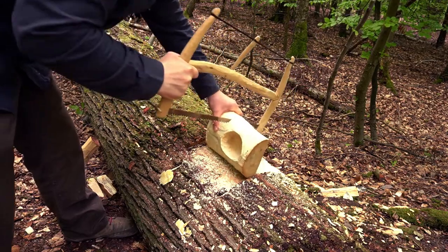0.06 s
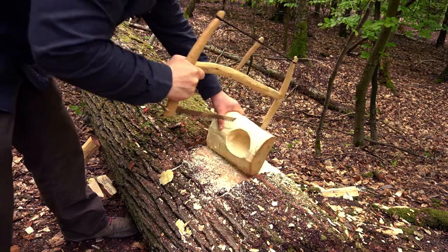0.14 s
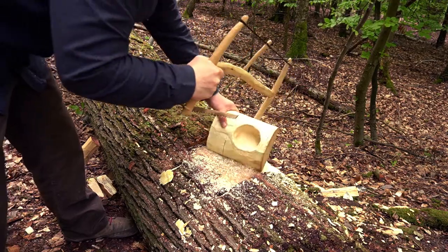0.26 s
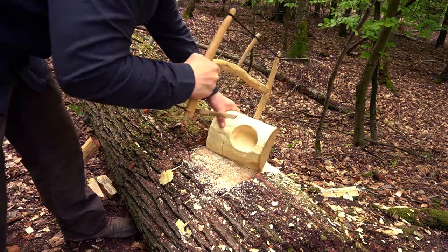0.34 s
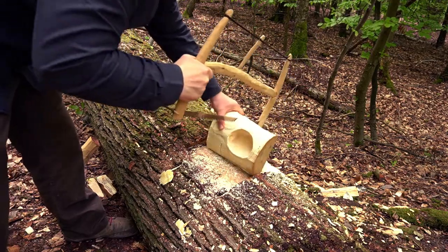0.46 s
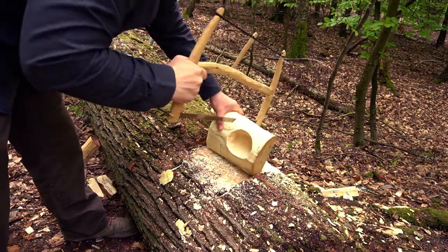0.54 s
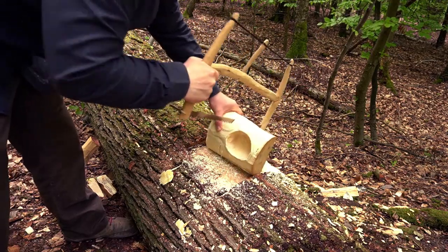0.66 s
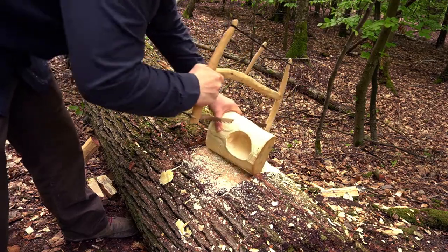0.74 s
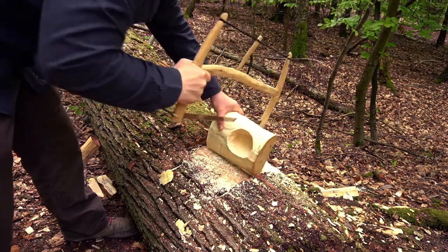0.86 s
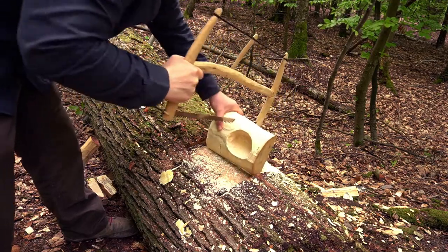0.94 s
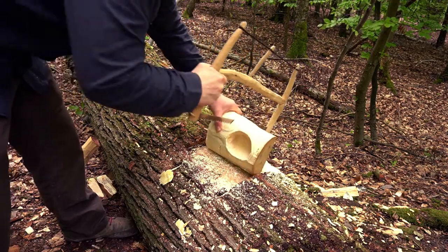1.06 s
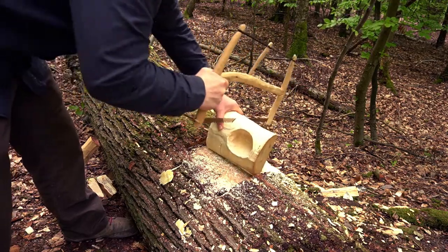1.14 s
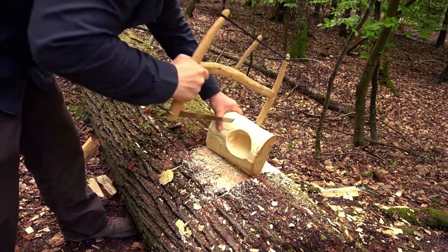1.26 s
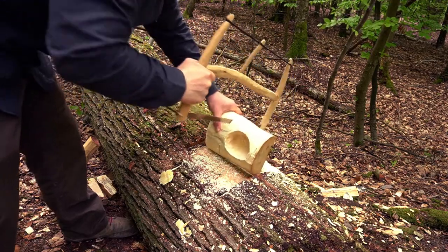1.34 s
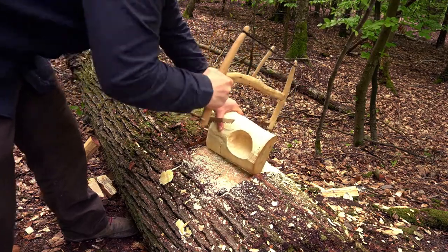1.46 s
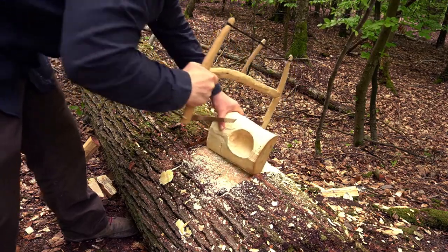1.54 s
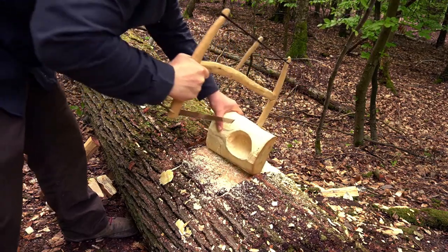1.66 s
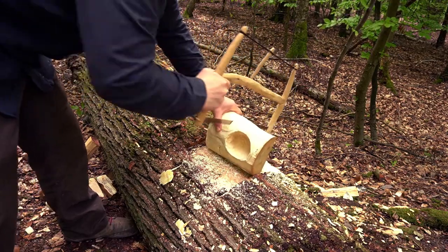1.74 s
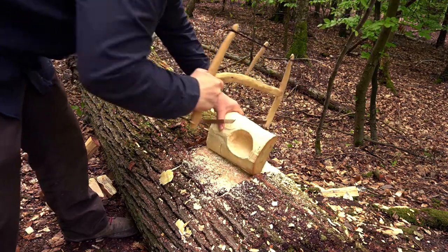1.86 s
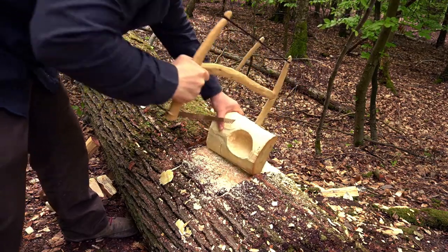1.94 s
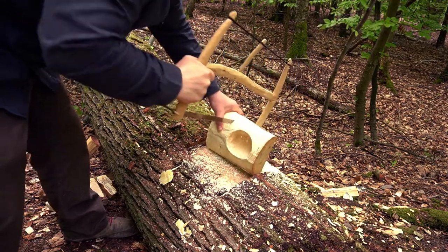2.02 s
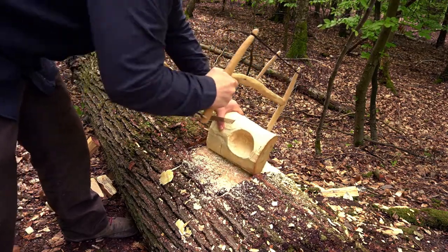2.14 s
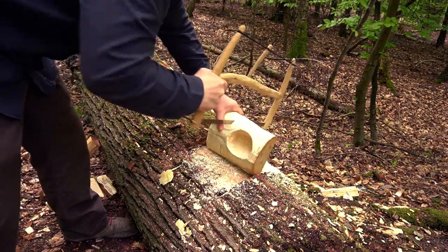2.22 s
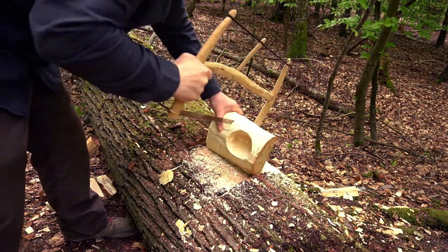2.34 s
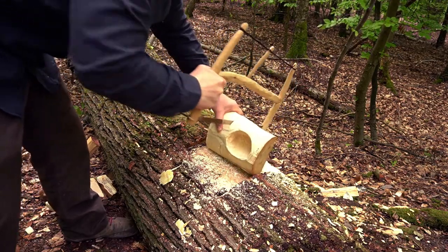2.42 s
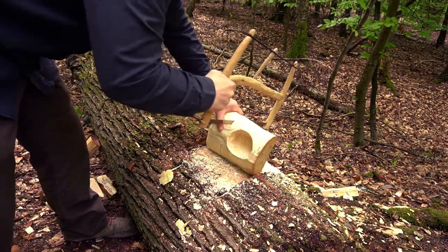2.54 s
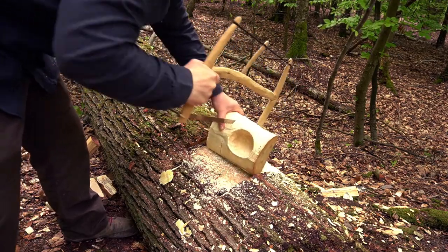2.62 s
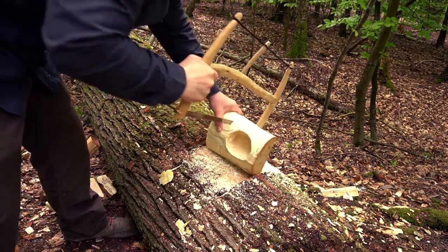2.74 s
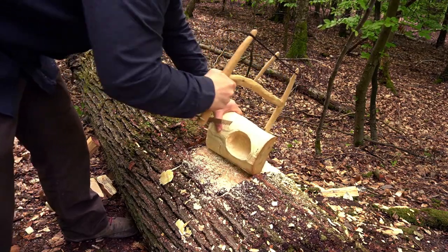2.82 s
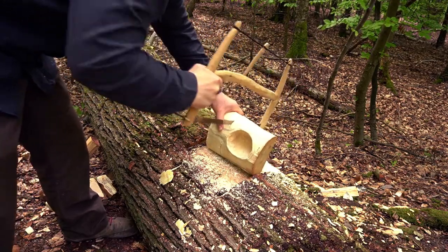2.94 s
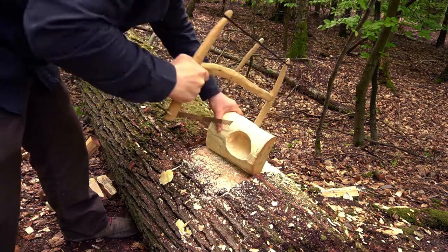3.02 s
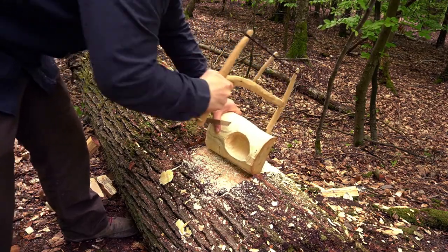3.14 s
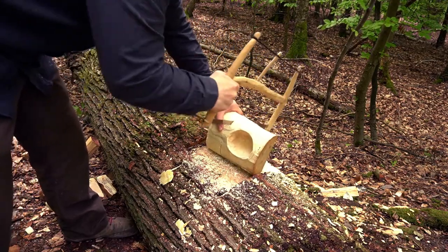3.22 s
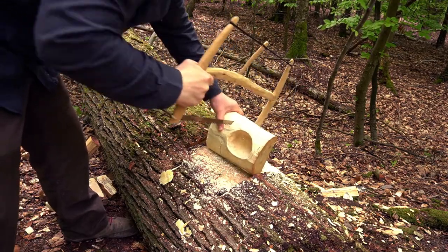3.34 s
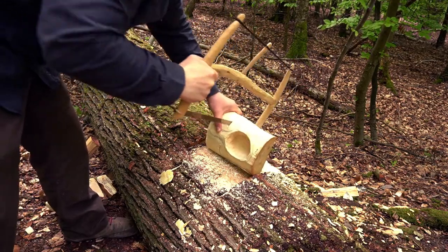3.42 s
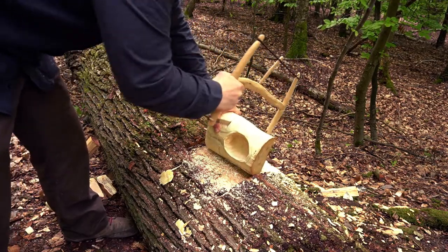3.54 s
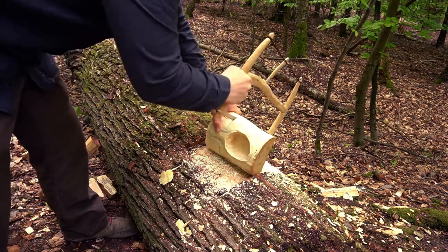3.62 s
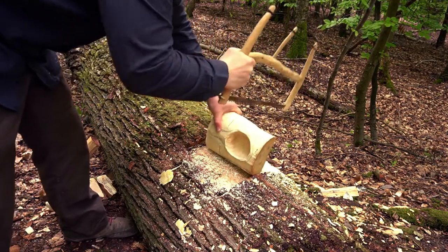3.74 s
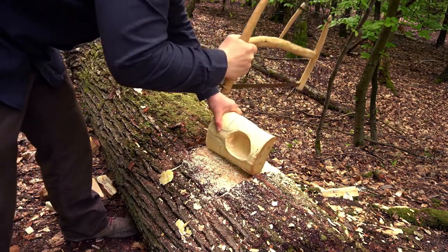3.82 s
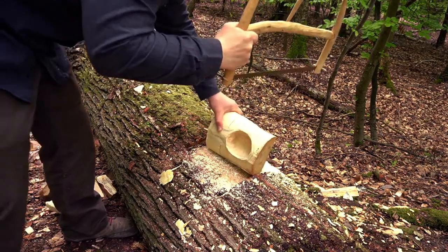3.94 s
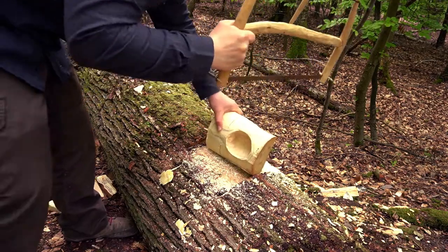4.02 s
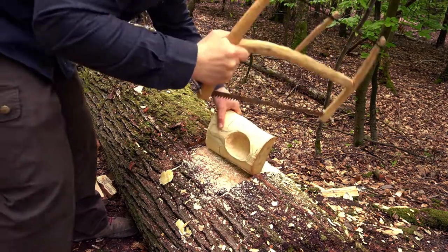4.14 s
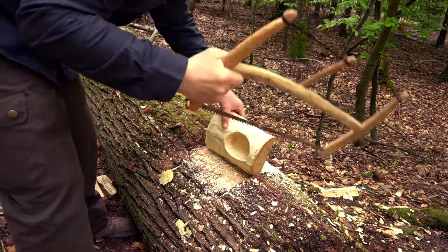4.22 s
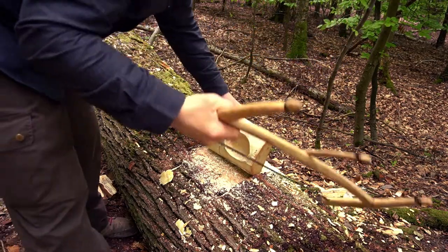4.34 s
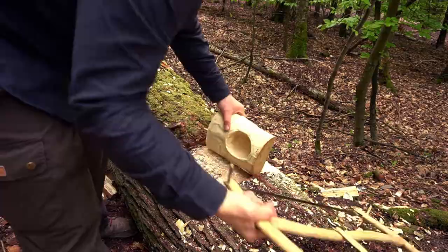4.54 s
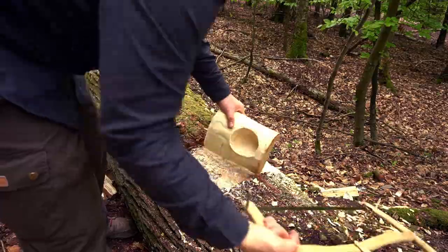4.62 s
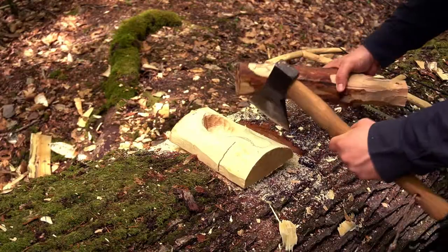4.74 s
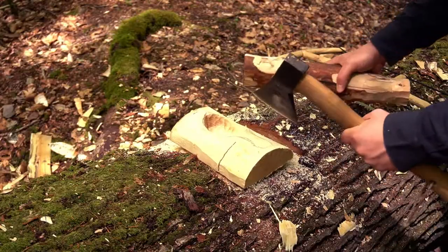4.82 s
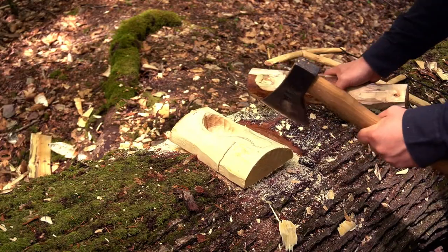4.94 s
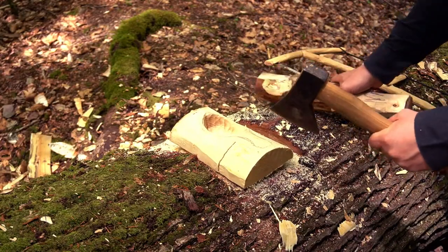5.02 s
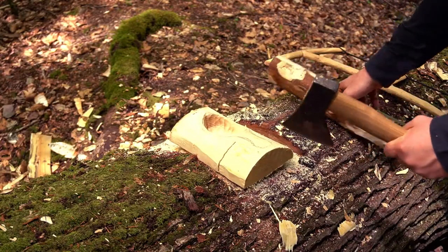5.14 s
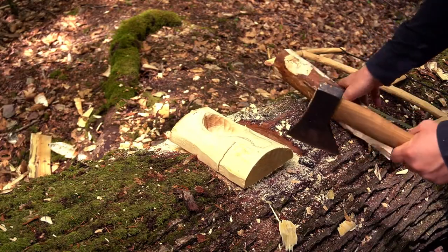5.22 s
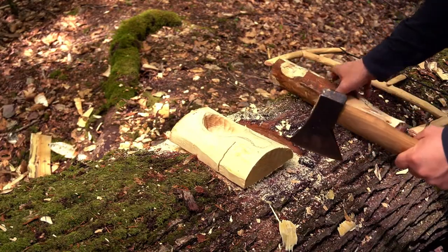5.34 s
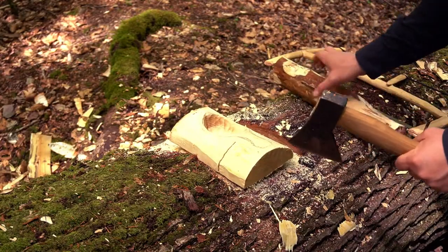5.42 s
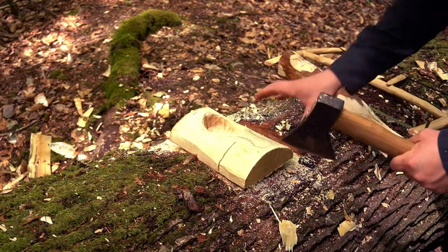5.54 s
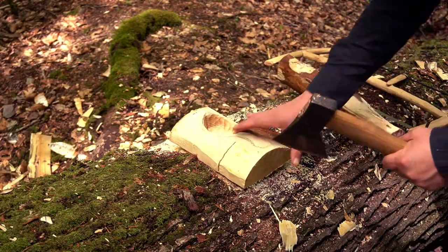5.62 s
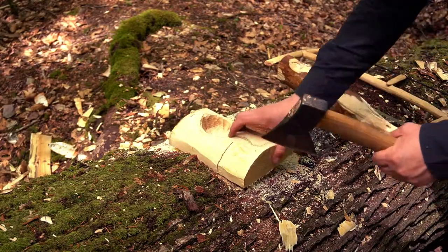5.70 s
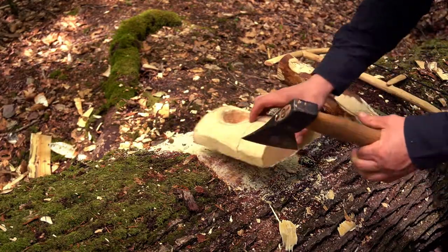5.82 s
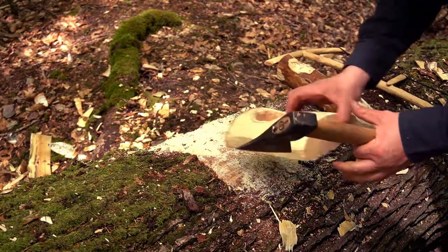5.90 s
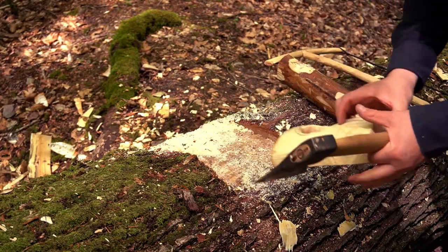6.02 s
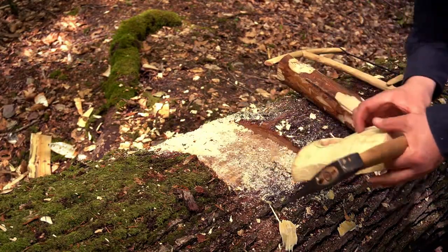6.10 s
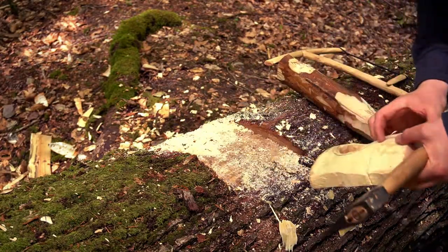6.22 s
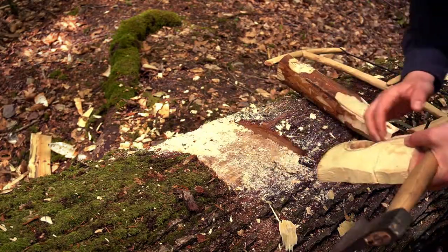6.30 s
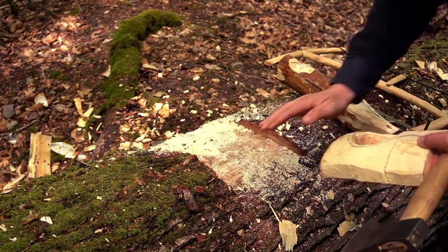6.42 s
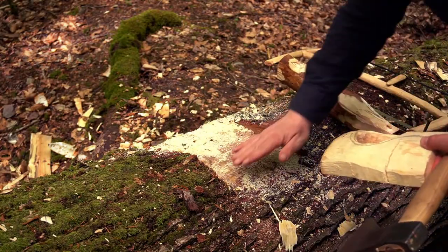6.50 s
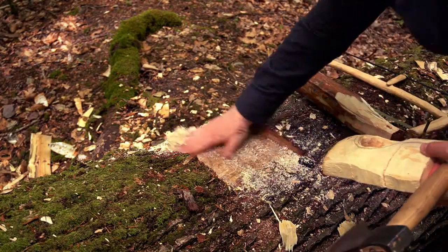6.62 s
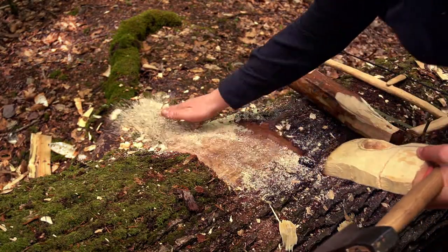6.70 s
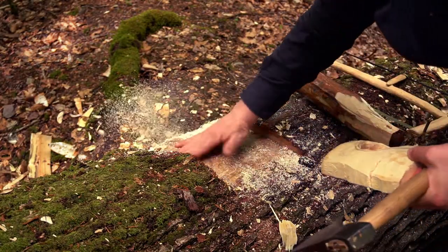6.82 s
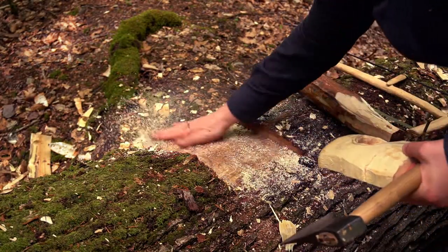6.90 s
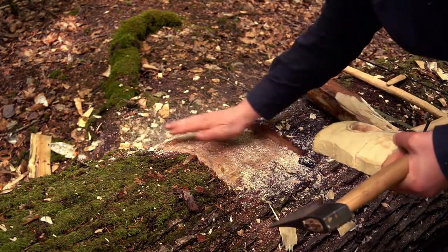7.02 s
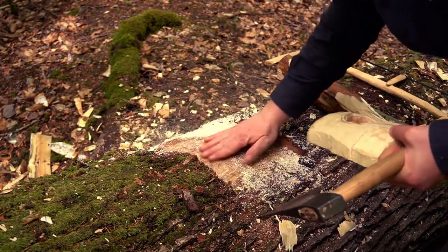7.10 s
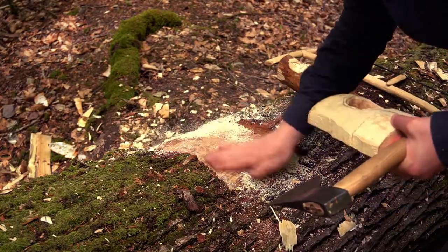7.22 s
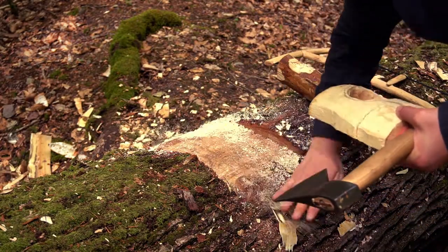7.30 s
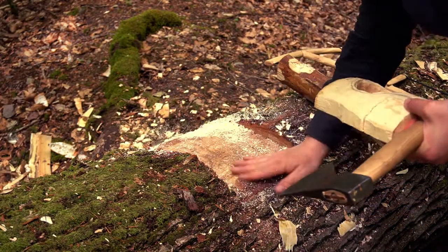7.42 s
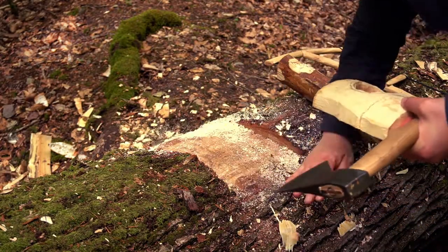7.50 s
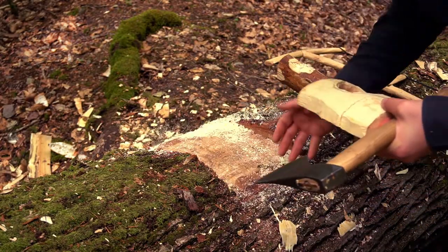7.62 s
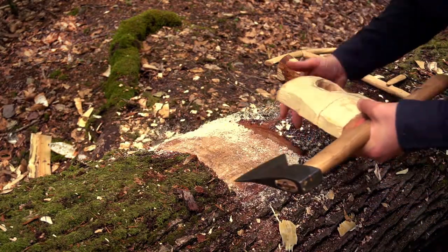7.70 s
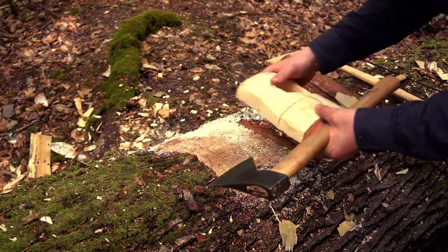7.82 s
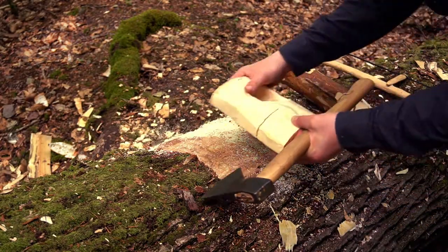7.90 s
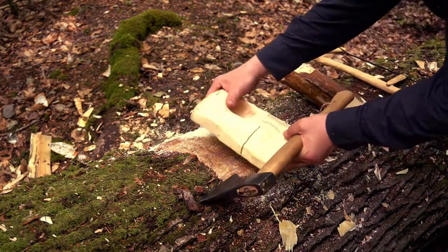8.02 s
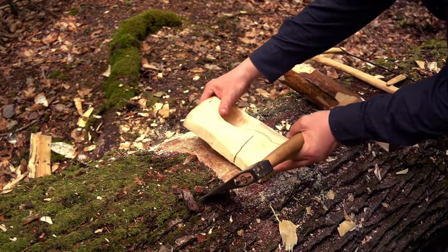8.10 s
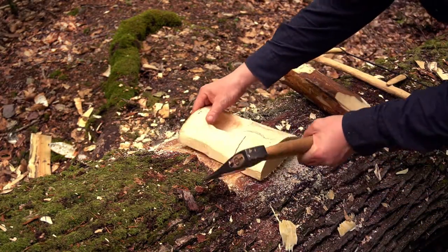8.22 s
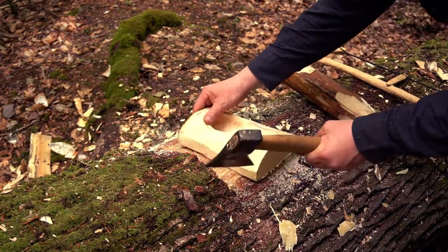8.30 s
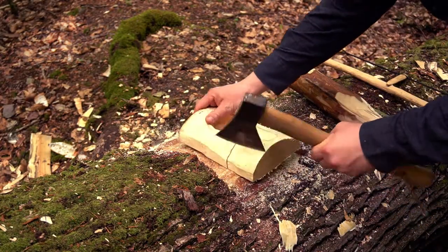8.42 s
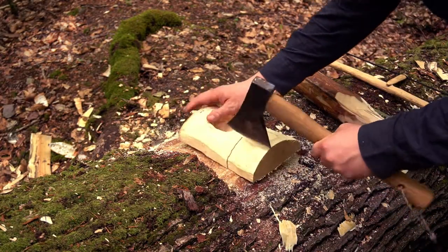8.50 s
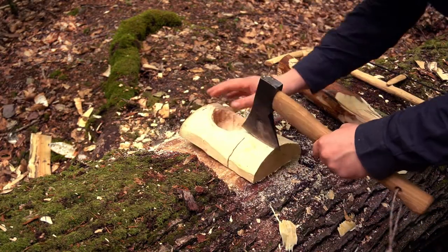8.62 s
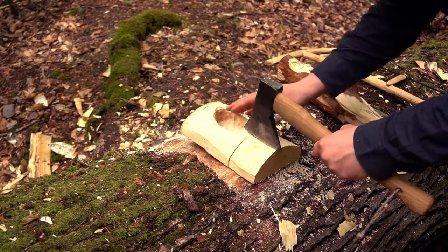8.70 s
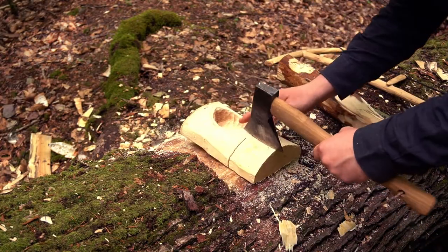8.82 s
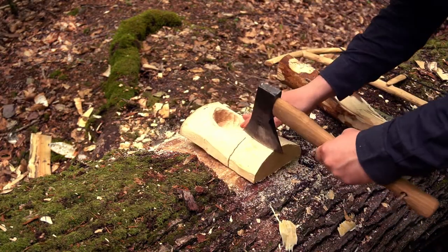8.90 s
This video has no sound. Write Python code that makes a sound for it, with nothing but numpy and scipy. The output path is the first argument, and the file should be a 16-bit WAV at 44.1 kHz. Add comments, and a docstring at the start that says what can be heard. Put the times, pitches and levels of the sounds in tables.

```python
"""A frame saw rasps to and fro through a hollowed block of green wood that knocks on a fallen trunk.
Its teeth tear fibres in dense clicks that drive the resonances of block and blade, until the blade is
lifted out with a clink. Then, closer to the trunk, chips tick, a bird sings far off, a hand sweeps
sawdust from the bark with a hiss of friction, and a touched hatchet head rings in its steel modes.
Trees echo the saw and the bird, and under everything lies the hush of the forest."""
import sys
import numpy as np
from scipy import signal
from scipy.fft import rfft, irfft, next_fast_len
from scipy.io import wavfile
from scipy.ndimage import uniform_filter1d

SR = 44100
rng = np.random.default_rng(int(sys.argv[2]) if len(sys.argv) > 2 else 0)


def write(x):
    x = np.atleast_2d(x).T
    wavfile.write(sys.argv[1], SR, np.round(np.clip(x, -1, 1) * 32767).astype(np.int16))


N = 394694
TIME = np.arange(N) / SR

# saw strokes: (start [s], attack [s], hold [s], level [dB], change over the hold [dB], brightness [dB])
SAW_STROKES = [(-.02, .02, 0.076, -32.5, -7, 0), (.12, 0.037, 0.081, -35, -7.5, -3.5),
               (.468, 0.024, 0.063, -44.5, -2, -3), (.64, 0.051, .058, -25, -3, -0.5),
               (.81, 0.03, 0.084, -31.5, -2, 1.5), (.985, 0.039, .075, -26.5, -1.5, 1),
               (1.175, 0.032, 0.073, -31, -8.5, 4.5), (1.31, 0.057, 0.061, -23.5, 1, 1.5),
               (1.51, 0.032, 0.08, -27, -8.5, 1.5), (1.655, 0.028, 0.092, -31, 7.5, 1.5),
               (1.86, 0.029, 0.093, -31.5, -6.5, 3), (2.01, 0.051, 0.075, -22.5, -1, -0.5),
               (2.215, 0.033, 0.084, -30.5, -2.5, 1.5), (2.38, 0.041, 0.07, -24.5, -0.5, 1.5),
               (2.565, 0.035, 0.085, -31, -3, 2.5), (2.725, 0.051, 0.068, -22, -2, -1),
               (2.905, 0.039, .085, -32, -3.5, 3), (3.06, 0.053, 0.056, -25, 5, 2),
               (3.26, .04, 0.079, -32.5, -4, 3), (3.41, 0.069, 0.078, -22.5, -5, -1.5),
               (3.64, 0.02, .05, -45, 2, 0.5)]
# the blade binds and jerks on through, mostly on the pull: (time [s], level [dB])
BLADE_JERKS = [(.165, -31), (.184, -29.5), (0.212, -32), (.236, -41), (.52, -40), (.546, -43), (.66, -31),
               (.848, -41), (.879, -30), (1.22, -25), (1.252, -29), (1.278, -35), (1.548, -24.5),
               (1.577, -27), (1.602, -29.5), (1.822, -37), (1.897, -20.5), (1.933, -23.5), (1.96, -32.5),
               (2.256, -35), (2.289, -27), (2.609, -30), (2.955, -29), (3.312, -24.5), (3.349, -27.5)]
# teeth catching in the kerf, mostly as the blade turns: (time [s], level [dB])
TOOTH_CATCHES = [(0.0196, -25), (.041, -33), (.0554, -37), (0.0704, -29), (.1294, -39), (0.1805, -29),
                 (0.471, -34), (0.506, -34.5), (.6107, -36), (.6477, -29.5), (.7667, -38), (.812, -35),
                 (.831, -31), (.96, -32), (.996, -33), (1.01, -25), (1.1612, -32.5), (1.454, -24.5),
                 (1.5046, -30), (1.537, -28), (1.6765, -34), (1.851, -25.5), (1.988, -38), (2.208, -31),
                 (2.2527, -21.5), (2.388, -37), (2.4163, -34), (2.5595, -34), (2.7211, -39), (2.914, -32),
                 (2.9291, -28), (3.077, -35), (3.2514, -34), (3.278, -26.5), (3.598, -42), (3.638, -29)]
# spectrum of tearing fibres: (frequency [Hz], level [dB])
FIBRE_SPECTRUM = [(88, -54.5), (150, -31.5), (328, -8), (555, -10.5), (1020, -11), (2060, -3.5),
                  (2360, -3.5), (3920, 0), (5050, 0.5), (10000, -2), (11900, -5), (15100, -0.5),
                  (16000, -8.5)]
# modes of the block: (frequency [Hz], bandwidth [Hz], level [dB])
BLOCK_MODES = [(320, 110, -8.5), (500, 56, -14.5), (810, 140, 1), (1174, 55, -3), (1500, 120, 2),
               (1790, 74, -0.5), (2126, 190, 3), (2640, 72, 3), (3750, 1600, 10.5), (6300, 170, -5),
               (11300, 130, -8)]
# modes of the blade: (frequency [Hz], level [dB], T60 [s])
BLADE_MODES = [(2350, -6.5, 0.015), (3620, -36, 0.022), (4350, -15, 0.02), (4960, -24, 0.045),
               (6100, -7.5, 0.047), (7360, -13.5, 0.017), (8200, -3, 0.0033), (10520, -8, 0.012),
               (12600, -19, 0.18)]
# the blade singing as it turns: (start [s], length [s], first pitch [Hz], last pitch [Hz], level [dB])
BLADE_SQUEAKS = [(.762, .055, 3810, 3790, -34), (.955, .045, 4300, 4280, -48), (.24, .12, 5000, 5000, -60),
                 (.7, .1, 12750, 12750, -50), (1.77, .09, 12800, 12800, -51),
                 (2.13, .09, 12800, 12800, -50), (2.49, .08, 12800, 12800, -51),
                 (3.17, .09, 12750, 12750, -52)]
# wood knocking softly on the trunk: (time [s], level [dB], pitch [Hz])
WOOD_KNOCKS = [(.184, -48, 192), (.459, -53, 175), (1.012, -34, 467), (1.193, -35, 280), (1.215, -35, 320),
               (1.41, -29, 336), (1.745, -40, 410), (1.863, -37, 258), (1.887, -31.5, 347),
               (1.939, -35, 292), (2.095, -27.5, 504), (2.22, -31, 288), (2.247, -28, 348),
               (2.584, -36, 310), (2.603, -32, 314), (2.63, -39, 397), (2.829, -34, 463), (2.916, -34, 320),
               (2.946, -37, 299), (3.106, -51, 294), (3.15, -33, 410), (3.275, -36.5, 278),
               (3.305, -34.5, 409), (5.055, -55, 180), (8.113, -48, 260)]
# stereo width of the saw: (frequency [Hz], side minus mid [dB])
SAW_WIDTH = [(100, -32), (400, -62), (700, -29), (1300, -35), (2400, -10), (4400, -9.5), (8100, -7.5),
             (15000, -12.5)]
# stereo balance of saw and block: (frequency [Hz], left minus right [dB])
SAW_BALANCE = [(300, 0), (2400, -1), (4400, .5), (8000, 1), (15000, .5)]
# hand sweeping the bark:
# (start [s], attack [s], hold [s], level [dB], change over the hold [dB], brightness [dB], pan [dB])
HAND_SWEEPS = [(6.565, 0.053, 0.059, -41, -3, -0.5, 0.5), (6.87, .02, 0.039, -48, 3, 5.5, 2.5),
               (7.13, 0.029, .015, -40, -7, 2.5, 1), (7.21, 0.018, 0.089, -46.5, 1, 4, 0),
               (7.365, .02, 0.031, -53, -1.5, 4, 0), (7.42, 0.013, 0.0045, -46, 3.5, -1.5, 1),
               (7.455, 0.02, 0.01, -44, 0.5, 1, 0), (7.94, 0.026, 0.296, -59.5, 2.5, -3.5, 0)]
# spectrum of dust scraping on bark: (frequency [Hz], level [dB])
DUST_SPECTRUM = [(530, -41), (900, -5.5), (1170, -14.5), (1280, -3), (2170, -7), (3730, -0.5), (5160, -5),
                 (13400, -4), (16000, -8)]
# chips and twigs ticking: (time [s], level [dB], pitch [Hz], brightness [dB], pan [dB])
CHIP_TICKS = [(4.1225, -26.5, 1590, -29, -1.5), (5.0549, -38, 3410, -22, 1.0), (5.467, -42, 1500, -25, 0),
              (5.6471, -41, 1910, -16, -13), (5.7603, -38, 1710, -10, -0.5), (6.804, -59.5, 1540, -6, 4),
              (6.8468, -36, 1620, -5, 2), (6.989, -38, 1700, -3, 4.0), (6.996, -39, 1550, 7, 8),
              (7.106, -29.5, 6830, 0.5, 15), (7.2574, -32, 8590, -11, 0.5), (7.5135, -33.5, 1950, -14, -9),
              (7.5426, -32, 2840, -13, -8), (7.602, -29, 3120, -19, -5), (7.659, -43, 3740, -17, -1.0),
              (7.963, -33, 3050, -2.5, 2), (8.111, -30, 1480, -5, -0.5), (8.644, -38, 3000, -7, 3)]
# modes of the hatchet head: (frequency [Hz], level [dB], free T60 [s])
HATCHET_MODES = [(2950, -4.5, 0.24), (3460, -18, 0.12), (4027, -25, .04), (5100, -22, .06),
                 (7601, -25, .04), (8770, -25, .5)]
# touches on the head: (time [s], level [dB], share of the free T60 [ratio])
HATCHET_TOUCHES = [(7.966, -41, .15), (8.665, -40, 0.31), (8.907, -31, 1.)]
# bird notes: (start [s], length [s], first pitch [Hz], last pitch [Hz], level [dB])
BIRD_NOTES = [(4.667, .02, 3350, 3860, -49.5), (4.718, .018, 3700, 3920, -50.5),
              (4.735, .016, 3260, 3640, -50), (4.7, .054, 4600, 4320, -59), (4.936, .03, 4750, 4520, -59),
              (4.953, 0.025, 4180, 3630, -47), (4.99, 0.025, 3450, 3180, -47.5),
              (5.088, 0.033, 3910, 3766, -44), (5.103, 0.019, 4020, 3850, -43.5),
              (5.116, 0.0342, 4040, 3330, -48.5), (5.14, .085, 3830, 3830, -55),
              (5.208, .026, 5700, 3880, -58), (5.222, 0.025, 4140, 3160, -49),
              (5.294, 0.083, 4550, 4500, -61), (5.375, .018, 5500, 4420, -57),
              (5.39, .018, 4340, 4040, -49), (5.755, 0.037, 3660, 3980, -60),
              (5.794, .06, 4350, 4260, -60.5)]
# one thin, far call: (time [s], pitch [Hz], level [dB])
BIRD_CALL = [(.3, 7750, -75), (.34, 7700, -65), (.45, 7600, -66), (.62, 7500, -75)]
# forest, quieter once close to the trunk: (time [s], hush level [dB], leaf level [dB])
FOREST_LEVELS = [(0.3, -48, -52.5), (3.76, -48.5, -55.5), (4.25, -48, -49.5), (4.66, -48, -51.5),
                 (4.68, -54, -59), (4.81, -54, -62.5), (8.95, -53.5, -62.5)]
# spectrum of the low hush: (frequency [Hz], level [dB])
HUSH_SPECTRUM = [(15, -60), (40, -39), (100, -20), (165, -19), (200, -9.5), (300, -3), (420, -1),
                 (700, -0.5), (1300, -4.5), (2000, -8.5), (2600, -16), (6000, -24), (12000, -68.5)]
# spectrum of the leaves: (frequency [Hz], level [dB])
LEAF_SPECTRUM = [(880, -29), (1500, -0.5), (2720, -4), (3840, -4.5), (9650, -14), (11400, -14),
                 (15100, -18), (16000, -21)]
# stereo width of the forest: (frequency [Hz], side minus mid [dB])
FOREST_WIDTH = [(60, -14.5), (110, -17), (200, -22), (380, -17), (700, -8.5), (1290, -7), (2380, -3.5),
                (4400, -3), (8120, 0), (15000, -6.5)]

CLINK_S, CLINK_DB, CLACK_DB = 3.6475, -19, -13   # the freed blade strikes the edge of the kerf
SLOW_DULL_DB = 9.5   # treble lost once the blade has slowed
JERK_HALF_WIDTH_S, JERK_BRIGHT_DB = .006, 3
TREES_T60_S, MIC_HISS_DB, CUTOFF_HZ = 0.87, -68, 15800


def saw():
    """Forced vibration: tearing fibres and catching teeth drive block and blade. Gives mid and side."""
    effort, bright_db = cutting_effort()
    catches = sum(burst(s, db, t60=0.03, rise_s=0.00072) for s, db in TOOTH_CATCHES)
    catches += burst(CLINK_S, CLACK_DB, t60=0.017, rise_s=0.0009)
    # each resonance comes and goes as the blade slides
    block_gains = [amp(3 * drift(11)) for mode in BLOCK_MODES]
    blade_gains = [amp(3 * drift(11)) for mode in BLADE_MODES]
    snap_spectrum = [(600, -25), (2500, -1.5), (7000, -1.5), (15000, -4)]   # (frequency [Hz], level [dB])
    clink, paths = blade_clink(), []
    for path in range(2):   # the side is sound scattered by bark and ground: same motion, other detail
        tearing = rms_one(colour(grains(per_s=14000, spread_db=2.62), FIBRE_SPECTRUM))
        block = sum(gain * amp(db) * np.sqrt(width) * ring(tearing, hz, np.log(1000) / (np.pi * width))
                    for gain, (hz, width, db) in zip(block_gains, BLOCK_MODES))
        rasp = rms_one(tearing + amp(-4.5) * rms_one(block))
        cut = effort * tilt(rasp, bright_db, split_hz=5000)
        snap = catches * rms_one(colour(rng.standard_normal(N), snap_spectrum))
        blade = sum(amp(db) / np.sqrt(t60 * SR) * ring(gain * amp(-11.5) * cut + snap, hz, t60)
                    for gain, (hz, db, t60) in zip(blade_gains, BLADE_MODES))
        paths.append(amp(2.5) * (cut + snap) + amp(7) * blade + clink)
    return paths


def cutting_effort():
    """Stick-slip: jerks add power and treble to the strokes. Gives amplitude and brightness [dB]."""
    level_db, slowed, bright_db = stroke_envelope(
        SAW_STROKES, rise_db=20, arch_db=1.5, drop_db=16, drop_s=0.021, fade_db_per_s=147)
    bright_db = uniform_filter1d(bright_db - SLOW_DULL_DB * slowed, size=200)
    effort = amp(uniform_filter1d(level_db, size=90) + 1.6 * drift(36) + 1.37 * drift(330))
    jerk_s, jerk_db = np.transpose(BLADE_JERKS)
    binds = np.zeros(N)
    binds[(jerk_s * SR).astype(int)] = amp(jerk_db) ** 2
    pulse = amp(-20 * (np.arange(-999, 1000) / SR / JERK_HALF_WIDTH_S) ** 2)
    jerk_power = np.abs(signal.fftconvolve(binds, pulse, "same"))
    power = effort ** 2 + jerk_power
    # soft limiting: the loudest strokes level off
    limited = amp(-22) * np.tanh(np.sqrt(power) / amp(-21))
    return limited, bright_db + JERK_BRIGHT_DB * jerk_power / power


def blade_clink():
    """Impulse response: one blow on the kerf rings the blade's modes, damped by the wood."""
    blow = impulse(CLINK_S, CLINK_DB)
    ringing = sum(amp(db) * ring(blow, hz, .4 * t60) for hz, db, t60 in BLADE_MODES)
    return ringing - lows(ringing, 1000)


def knocks():
    """Heavy damping: the hollow block and the trunk answer soft blows with a few low cycles."""
    out = np.zeros(N)
    for s, db, hz in WOOD_KNOCKS:
        cycles = hz * np.clip(TIME - s, 0, 1)
        swell = (cycles / (cycles + 1.4)) ** 2 * amp(-5 * cycles)
        out += amp(db) * swell / swell.max() * np.sin(2 * np.pi * cycles)
    return out


def dust_sweeps():
    """Friction noise: dust and chips scrape over bark in tiny impacts that merge into a grainy hiss."""
    # the level drops as the hand lifts, then fades as the dust trickles down
    level_db, _, bright_db, pan_db = stroke_envelope(
        HAND_SWEEPS, rise_db=16.5, arch_db=2.5, drop_db=15, drop_s=0.0098, fade_db_per_s=20)
    scrape = [rms_one(colour(grains(per_s=9000, spread_db=2.2), DUST_SPECTRUM)) for path in range(2)]
    mid, side = tilt(np.array(scrape), bright_db, split_hz=3300)
    gain = amp(level_db + 1.43 * drift(60) + np.outer([.5, -.5], pan_db))
    return gain * (mid + amp(-11.5) * side * [[1], [-1]])


def chip_ticks():
    """Impact transients: each chip or twig gives a broadband snap and a short ring at its own pitch."""
    noise = rms_one(colour(rng.standard_normal(N), DUST_SPECTRUM))
    dull, bright = butter(noise, 4, 6000, "low"), butter(noise, 4, 6000, "high")
    out = np.zeros((2, N))
    for s, db, hz, bright_db, pan_db in CHIP_TICKS:
        dull_gain = np.sqrt(1.05 - np.minimum(amp(bright_db), 1) ** 2)
        snap = burst(s, db - 7, t60=0.017, rise_s=.0003) * (dull_gain * dull + amp(bright_db) * bright)
        tone = ring(impulse(s, db - 11.5), hz, t60=0.015)
        out += (tone + snap) * amp([[pan_db / 2], [-pan_db / 2]])
    return out


def hatchet():
    """Free vibration: a soft contact rings the steel's modes; a hand on the head adds damping."""
    out = np.zeros(N)
    for s, db, free_share in HATCHET_TOUCHES:
        contact = impulse(s, db)
        out += sum(amp(mode_db) * ring(contact, hz, t60 * free_share)
                   for hz, mode_db, t60 in HATCHET_MODES)
    return butter(out, 2, 1800, "high")


def birds():
    """Frequency modulation: gliding notes and one thin call, so distant that much arrives as echo."""
    song = glides(BIRD_NOTES, flutter=.2)
    hz, db = in_time(BIRD_CALL)
    calling = (TIME > BIRD_CALL[0][0]) & (TIME < BIRD_CALL[-1][0])
    song += amp(db + 2 * drift(30)) * calling * np.sin(2 * np.pi * np.cumsum(hz) / SR)
    return song * amp([[1.5], [-1.5]]) + amp(3) * tree_echo(song)


def tree_echo(x):
    """Reverberation: trunks scatter a dense, dying echo, a different one to each ear."""
    t = np.arange(SR) / SR
    tail = rng.standard_normal((2, SR)) * amp(-60 * t / TREES_T60_S) * (t > .008)
    return signal.fftconvolve(x[None], tail / np.linalg.norm(tail[0]), axes=1)[:, :N]


def forest():
    """Diffuse noise: a low hush and a hiss of leaves, less alike at the two ears in the treble."""
    hush_db, leaf_db = in_time(FOREST_LEVELS)
    white = rng.standard_normal((2, 2, N))
    layers = [(HUSH_SPECTRUM, hush_db + .5 * drift(5)), (LEAF_SPECTRUM, leaf_db + .5 * drift(8))]
    out = np.zeros((2, N))
    for (mid, side), (spectrum, db) in zip(white, layers):
        side = colour(side, FOREST_WIDTH)
        out += amp(db) * rms_one(colour(np.array([mid + side, mid - side]), spectrum))
    return out


def stroke_envelope(rows, rise_db, arch_db, drop_db, drop_s, fade_db_per_s):
    """Masking: the loudest stroke rules. Gives its level [dB], share of the drop and extra columns."""
    rows, hop = np.array(rows), 32
    start, attack, hold, db, change_db = rows.T[:5, :, None]
    t = np.arange(0, N + hop, hop) / SR - start - attack   # zero where the hold begins
    held, after = np.clip(t / hold, 0, 1), np.maximum(t - hold, 0)
    dropped = 1 - np.exp(-after / drop_s)
    attack_db = rise_db * np.minimum(t / attack, 0) + 3000 * np.minimum(t + attack, 0)
    hold_db = db + change_db * held + arch_db * np.sin(np.pi * held)
    level_db = attack_db + hold_db - drop_db * dropped - fade_db_per_s * after
    loudest, frames = level_db.argmax(axis=0), np.arange(t.shape[1])
    columns = [level_db[loudest, frames], dropped[loudest, frames], *rows[loudest, 5:].T]
    return [np.interp(np.arange(N) / hop, frames, c) for c in columns]


def glides(rows, flutter):
    """Linear chirps: short sliding sines, roughened by fast amplitude modulation."""
    out = np.zeros(N)
    for s, length, start_hz, end_hz, db in rows:
        progress = np.clip((TIME - s) / length, 0, 1)
        cycles = length * progress * (start_hz + (end_hz - start_hz) * progress / 2)
        out += amp(db) * np.sin(np.pi * progress) * np.sin(2 * np.pi * cycles)
    return out * (1 + flutter * drift(250))


def ring(force, hz, t60):
    """Damped resonator: a unit impulse starts a sine of height 1 that falls 60 dB in t60 seconds."""
    r, w = amp(-60 / (t60 * SR)), 2 * np.pi * hz / SR
    return signal.lfilter([0, np.sin(w)], [1, -2 * r * np.cos(w), r * r], force + 1e-18)


def impulse(s, db):
    """Ideal blow: a single sample at time s."""
    return amp(db) * (np.arange(N) == round(s * SR))


def burst(s, db, t60, rise_s):
    """Exponential decay: an envelope that jumps up at time s and dies away."""
    t = np.clip(TIME - s, 0, 1)
    return amp(db - 60 * t / t60) * (1 - np.exp(-t / rise_s))


def grains(per_s, spread_db):
    """Shot noise: dense clicks of uneven size and random sign; rms 1."""
    sizes = amp(spread_db * np.minimum(rng.exponential(1, N), 5)) * rng.choice([-1, 1], N)
    return rms_one(sizes * (rng.random(N) < per_s / SR))


def drift(hz):
    """Random modulation: noise low-passed at hz; rms 1."""
    r = np.exp(-2 * np.pi * hz / SR)
    return rms_one(signal.lfilter([1], [1, -2 * r, r * r], rng.standard_normal(N + SR))[SR:])


def colour(x, points):
    """Spectral shaping by a curve of (frequency [Hz], gain [dB])."""
    size = next_fast_len(N + 4096)
    bin_hz = np.arange(size // 2 + 1) * SR / size
    hz, db = np.transpose(points)
    gain = amp(np.interp(np.log1p(bin_hz), np.log1p(hz), db))
    return irfft(rfft(x, size) * gain, size)[..., :N]


def tilt(x, bright_db, split_hz):
    """Shelving filter: moves the treble up or down over time."""
    low = lows(x, split_hz)
    return low + amp(bright_db) * (x - low)


def lows(x, hz):
    """Zero-phase low-pass: subtracting it leaves the treble."""
    return signal.sosfiltfilt(signal.butter(2, hz, fs=SR, output="sos"), x)


def butter(x, order, hz, kind):
    """Maximally flat low-pass or high-pass."""
    return signal.sosfilt(signal.butter(order, hz, kind, fs=SR, output="sos"), x)


def in_time(rows):
    """Linear interpolation of each column over the times in the first."""
    s, *columns = np.transpose(rows)
    return [np.interp(TIME, s, c) for c in columns]


def amp(db):
    """Decibels to amplitude ratio."""
    return 10 ** (np.asarray(db) / 20)


def rms_one(x):
    """Normalisation to rms 1."""
    return x / np.sqrt(np.mean(x ** 2) + 1e-20)


def scene():
    """Superposition: near work at the trunk, its faint echo, the birds and the forest."""
    mid, side = saw()
    mid = mid + knocks() + glides(BLADE_SQUEAKS, flutter=0.43)
    side = colour(side, SAW_WIDTH)
    left = colour(mid + side, np.array(SAW_BALANCE) * [1, .5])
    right = colour(mid - side, np.array(SAW_BALANCE) * [1, -.5])
    near = np.array([left, right]) + amp(-23.5) * tree_echo(mid)
    near = butter(near, 1, 120, "high")   # microphone low cut: the sawing has no deep bass
    return near + dust_sweeps() + chip_ticks() + hatchet() + birds() + forest()


def record(dry):
    """Self-noise and band limiting: the microphone adds a thin hiss, and the top is cut steeply."""
    hiss = butter(rng.standard_normal((2, N)), 2, 7000, "high")
    top_cut = signal.ellip(12, .3, 65, CUTOFF_HZ, fs=SR, output="sos")
    return signal.sosfilt(top_cut, dry + amp(MIC_HISS_DB) * hiss)


dry = scene()
out = record(dry)
write(out)
```